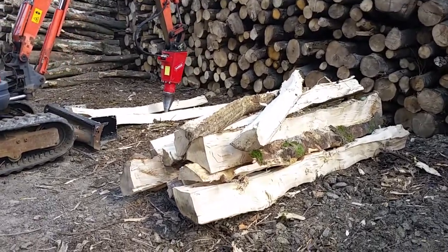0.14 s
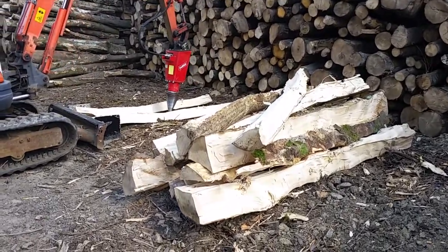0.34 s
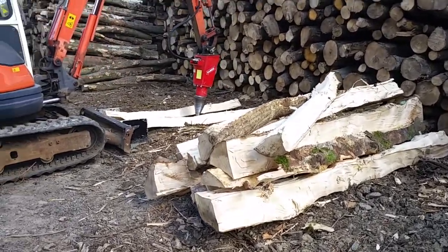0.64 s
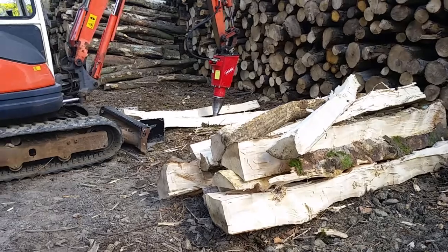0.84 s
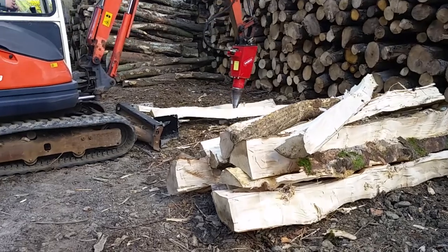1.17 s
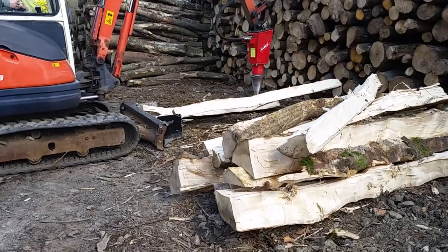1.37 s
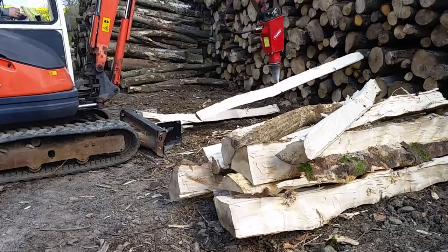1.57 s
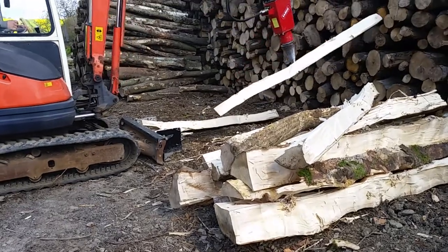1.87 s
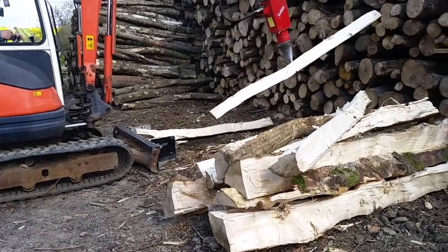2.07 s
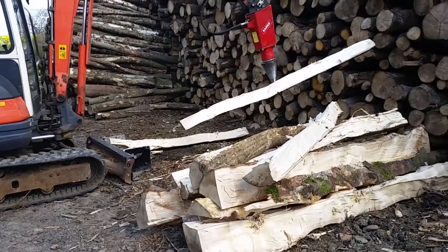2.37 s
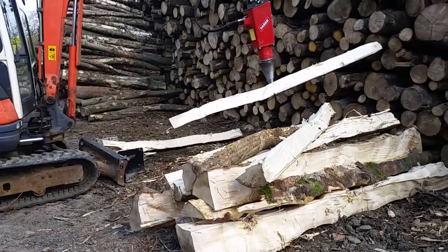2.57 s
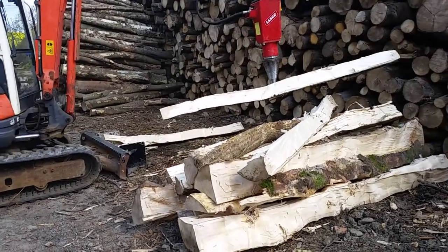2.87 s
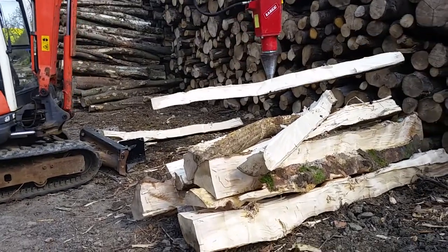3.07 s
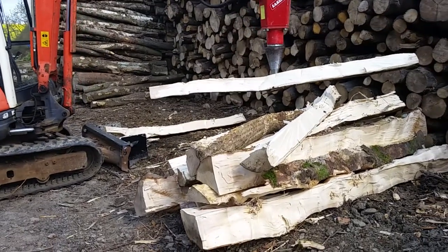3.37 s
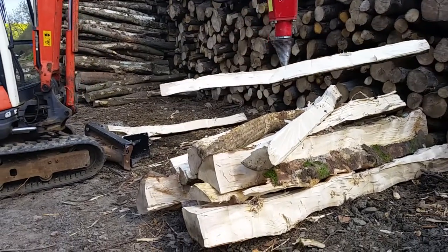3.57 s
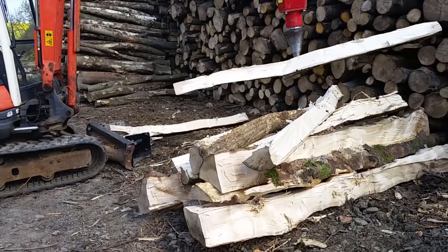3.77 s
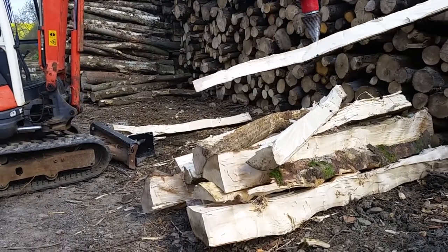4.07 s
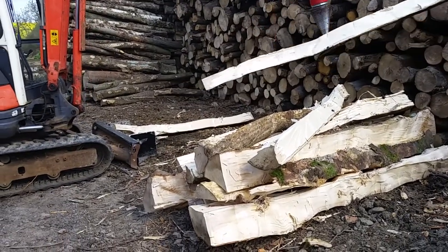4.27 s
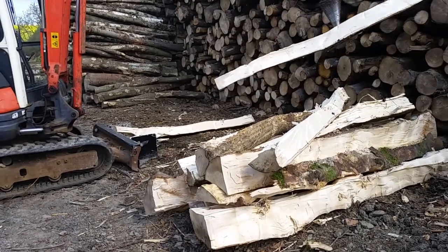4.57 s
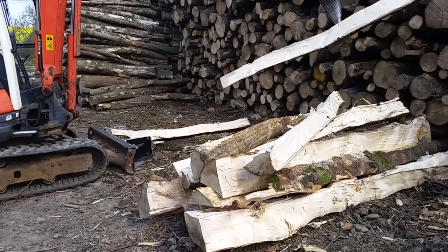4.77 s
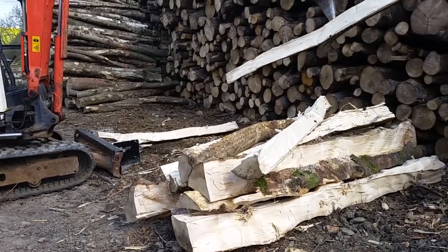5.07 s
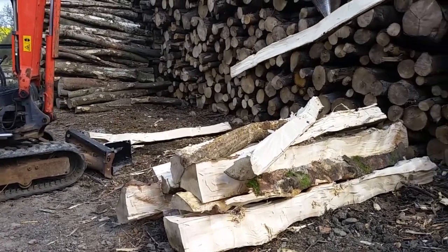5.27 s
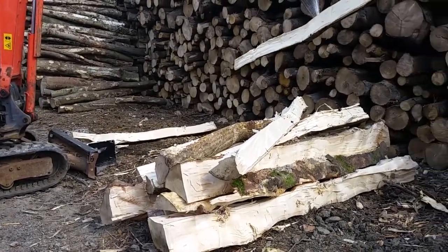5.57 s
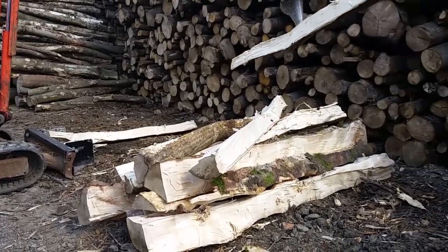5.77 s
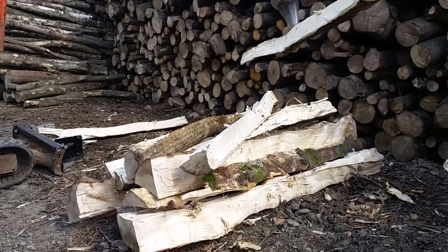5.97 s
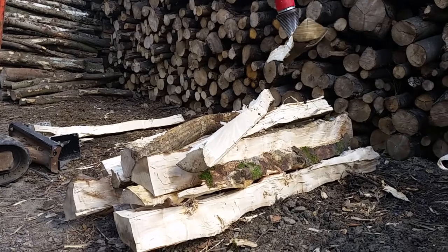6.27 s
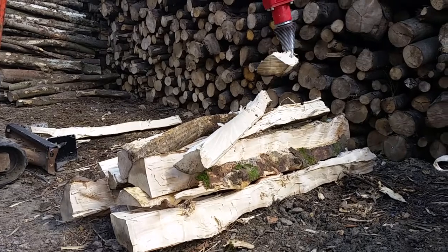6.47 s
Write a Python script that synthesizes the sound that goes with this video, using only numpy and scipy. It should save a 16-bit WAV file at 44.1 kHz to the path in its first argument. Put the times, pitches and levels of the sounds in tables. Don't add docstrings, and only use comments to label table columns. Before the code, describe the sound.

Low throbbing engine drone fills a wide phone pickup, slightly favouring machines to the left. Hydraulic flow hisses strongly at first, with a brief falling whistle and a whine. Wood cracks and hollow thuds cluster in the first second or so, mixed with gritty clicks and a metallic squeak. The hiss then eases; faint high chirps gather toward the end, a finger snaps against the left edge, and timber taps lightly.

```python
import sys
import numpy as np
from scipy import signal
from scipy.fft import rfft, irfft, next_fast_len
from scipy.io import wavfile
from scipy.ndimage import uniform_filter1d

SR = 44100
rng = np.random.default_rng(int(sys.argv[2]) if len(sys.argv) > 2 else 0)


def nominal_scale(level):
    x = np.asarray(level, float) / 20
    return 10 ** x


def waveform_to_disk(signal):
    frames = np.transpose(np.atleast_2d(signal))
    scaled = np.clip(frames, -1, 1) * 32767
    samples = np.round(scaled).astype(np.int16)
    wavfile.write(sys.argv[1], SR, samples)


N = 292824
LONG = next_fast_len(N)
FREQ = np.fft.rfftfreq(LONG, 1 / SR)

# (time [s], firings gained on four per idler cycle [count], boom level [dB])
EXCAVATOR_LOAD = [(0.0, -0.288, -19.6), (0.64, 0.931, -22.3), (1.08, 2.091, -24.1), (1.16, 2.263, -20.0),
                  (1.31, 1.99, -24.9), (1.66, 1.67, -25.9), (2.09, 1.498, -19.5), (2.28, 1.536, -21.2),
                  (2.99, 2.695, -21.8), (3.11, 2.846, -21.7), (3.66, 3.078, -24.8), (4.05, 3.122, -20.9),
                  (4.38, 3.496, -22.4), (4.72, 3.582, -21.1), (5.06, 3.811, -27.0), (5.39, 3.921, -23.8),
                  (5.96, 3.753, -27.4), (6.64, 3.501, -24.7)]
# (multiple of cycle rate [count], level [dB])
IDLER_LINES = [(5, -44), (6, -51.5), (7, -28), (8, -15.5), (9, -51), (10, -39), (11, -47.5), (12, -44.5),
               (14, -50.5), (15, -42), (16, -42), (20, -52.5)]
# (thirds of the firing rate [count], level [dB])
EXCAVATOR_LINES = [(4, -50.5), (5, -57.5), (7, -52), (8, -41), (10, -46.5), (12, -63.5), (15, -62.5),
                   (18, -48), (24, -48.5)]
# (frequency [Hz], level per Hz [dB], share reaching both ports alike [0-1])
ROAR_SPECTRUM = [(22, -70.5, 0.98), (41.3, -50.5, 0.7), (71.4, -44.5, 0.86), (128, -42.5, 0.89),
                 (174, -48.5, 0.95), (329, -62.5, .92), (493, -64.5, .88), (543, -73, 0.6),
                 (597, -71.5, .85), (916, -78.5, 0), (1250, -81.5, 0.9), (2320, -91.5, 0.2),
                 (3750, -81.5, .15), (15800, -106, .4)]
# (time [s], whine frequency [Hz], whine level [dB], oil flow above resting hiss [dB])
PUMP_WORK = [
    (0, 630.7, -54.5, 5.5),
    (.5, 644.2, -49, 6),
    (.7, 640, -62.5, 4),
    (1.7, 629.6, -53.5, 4.5),
    (2.0, 639.7, -65.5, 2.5),
    (2.8, 668, -68.5, 0.5),
    (3.2, 680, -52.5, 0),
    (5.4, 670.8, -53, 0),
    (5.9, 673, -57.5, -0.5),
    (6.64, 678, -49, 1.5),
]
# (frequency [Hz], level [dB])
MACHINE_HUMS = [(217, -42), (265, -47.5), (310, -50), (410, -54), (480, -57), (780, -69), (900, -59),
                (1126, -64.5)]
# (time [s], frequency [Hz], level [dB])
VALVE_WHISTLE = [
    (0, 6700, -90),
    (.2, 6650, -62),
    (.38, 6300, -60),
    (.46, 5850, -60),
    (.55, 5800, -64),
    (.62, 5800, -95),
]
# (time [s], peak level [dB], ring frequency [Hz], body over peak [dB], time to fall 60 dB [s])
TIMBER_KNOCKS = [(0.566, -27, 2600, 1, 0.13), (0.853, -20, 2300, -4.5, 0.29), (0.932, -32, 1740, 7.5, 0.31),
                 (0.948, -15.5, 1744, -1, 0.25), (0.975, -32.5, 1860, 1.5, 0.12),
                 (1.035, -25, 2550, 4, 0.42), (1.059, -37.5, 2550, 6, 0.39), (1.109, -28, 2000, 6, 0.43),
                 (1.152, -17, 1880, -7.5, 0.14), (1.447, -38.5, 1610, 1, 0.28),
                 (1.479, -40, 1664, 11, 0.11), (1.586, -36, 2300, 12, 0.2), (1.684, -36.5, 1600, 11, 0.18),
                 (1.949, -34, 1880, 9, 0.236), (2.209, -42.5, 1836, 5.5, 0.13),
                 (3.968, -36.5, 1400, 8.5, 0.38), (6.018, -39, 1720, 0, 0.15),
                 (6.458, -34, 2560, 8.5, 0.18)]
# (time [s], frequency [Hz], level [dB], time to fall 60 dB [s])
WOOD_TAPS = [(0.5655, 1920, -21.5, .008), (0.567, 3860, -33, .008), (0.471, 3800, -30, 0.013),
             (0.568, 6400, -21, .008), (0.938, 777, -26, 0.11), (0.946, 329, -19, 0.18),
             (0.984, 263, -15, 0.23), (1.105, 289, -19, .08), (1.036, 635, -31.5, 0.39),
             (1.154, 2000, -35, 0.013), (1.154, 284, -14, .07), (1.155, 1120, -29, 0.065),
             (1.585, 1400, -37.5, .03), (1.949, 1860, -42.5, .08), (1.949, 700, -30, .05),
             (6.017, 1700, -50, 0.028), (6.018, 666, -25.5, 0.042), (6.024, 886, -41.5, 0.16),
             (6.458, 2550, -37, .02), (6.458, 1700, -38.5, .02), (6.464, 713, -28.5, 0.098),
             (6.468, 2120, -44.5, 0.13)]
# (time [s], peak level [dB], left minus right [dB])
GRIT_TICKS = [(0.0703, -30, -13), (0.0936, -30, -0.5), (0.110, -43, -1), (0.1487, -34, -6.5),
              (0.179, -19.5, -7.5), (0.3731, -20.5, 3), (0.4705, -27.5, -8.5), (0.5354, -37, 7),
              (0.5679, -23, -3.5), (0.852, -38, 0.5), (0.932, -33, -2), (0.9483, -29.5, 10),
              (0.9798, -24.5, -13), (1.1224, -37, -22), (1.151, -42, -10), (1.275, -37.5, -10),
              (1.397, -32, 4), (1.72, -32.5, -1)]
# (time [s], frequency [Hz], level [dB], length [s], left minus right [dB])
CONE_SQUEAKS = [
    (1.075, 8760, -20, .007, -4),
    (1.1, 8700, -36, .012, -4),
    (1.106, 5300, -40, .003, -4),
    (1.116, 5420, -22, .008, -4),
    (1.116, 3610, -38, .008, -3),
    (1.115, 7250, -38, .006, -3),
    (1.169, 4290, -35, .006, 0),
]
# (time [s], level about usual [dB])
BELT_SLIP = [(0, -4), (1.0, -10), (1.3, 12.5), (1.6, -0.5), (2.7, -13.5), (3.5, 1), (5.45, 1), (5.58, 16.5),
             (6.0, 3), (6.3, 15), (6.64, 2)]
# (time [s], peak level [dB], left minus right [dB])
BELT_CHIRPS = [(2.522, -47, 8), (2.7528, -47, 11.5), (2.814, -43.5, 2.5), (2.9639, -41.5, 6.5),
               (3.485, -38, 6.5), (3.562, -41, 5.5), (3.88, -42, -3), (4.1781, -40.5, 5.5),
               (4.2724, -45.5, -2.5), (4.331, -41.5, 4), (4.368, -46.5, -0.5), (4.407, -43, 1),
               (4.652, -45.5, 9.5), (4.8195, -37.5, 12), (5.3689, -43.5, 7), (5.56, -44, 15),
               (5.665, -40.5, 15.5), (5.743, -46.5, 9), (5.766, -38.5, 23), (5.832, -38.5, 16.5),
               (6.082, -30, 8.5), (6.1232, -53, 2.5), (6.146, -38.5, 10.5), (6.261, -47, -3),
               (6.314, -37, 17.5), (6.34, -34.5, 17), (6.392, -39, 5), (6.503, -42.5, 12.5),
               (6.527, -40.5, 17.5), (6.556, -40, 23)]
# (time [s], level [dB])
FINGER_CLICKS = [(5.4628, -33), (5.4825, -49), (5.509, -32), (5.5115, -34), (5.522, -45), (5.526, -42),
                 (5.533, -35), (5.536, -30.5), (5.541, -31), (5.545, -28.5), (5.5475, -31.5), (5.5524, -12),
                 (5.563, -45)]
# (frequency [Hz], left level [dB], right level [dB])
PORT_COLOUR = [(96, -1.02, 0.38), (1460, 2, 3), (2580, 0, 3), (3650, 4.5, -9), (3960, -1, -10),
               (4760, -12.5, -12), (6650, -28.5, -21), (8600, -40.5, -27.5), (10940, -11, -17.5),
               (11600, -5.5, -4.5), (15400, 18.5, 16.5), (15800, 12.5, 6.5), (15960, -39, -31)]


def curves(table):
    s, *columns = np.transpose(table)
    return [np.interp(np.arange(N) / SR, s, c) for c in columns]


def along(table, axis):
    rows = np.array(table)
    return np.interp(np.log(FREQ + 1), np.log(rows[:, 0]), rows[:, axis])


def walk(rate):
    hold = int(SR / rate)
    steps = np.repeat(rng.standard_normal(N // hold + 1), hold)
    return 0.87 * uniform_filter1d(steps, hold)[:N]


def band(x, hz, width_hz):
    return signal.lfilter(*signal.iirpeak(hz, hz / width_hz, SR), x)


def steep(x, hz, width_hz):
    ringing = band(band(x, hz, width_hz), hz, width_hz)
    return ringing / np.sqrt(np.mean(ringing ** 2))


def add(out, s, sound, pan_db):
    i = int(s * SR)
    sides = nominal_scale(np.array([[pan_db], [-pan_db]]) / 2)
    out[:, i:i + sound.shape[-1]] += (sides * sound)[:, :N - i]


def cranks():
    gained, boom_db = curves(EXCAVATOR_LOAD)
    idle_hz = 12.6412 - .00068 * (np.arange(N) / SR - 4.32) ** 2
    idler = 2 * np.pi * (-.259 + np.cumsum(idle_hz) / SR)
    digger = 4 * idler + 2 * np.pi * uniform_filter1d(gained, size=3000)
    return idler, digger, boom_db


def exhausts(idler, digger, boom_db):
    boom_lag = 1.43
    out = sum(nominal_scale(db + .4 * walk(3)) * np.cos(k * idler + boom_lag) for k, db in IDLER_LINES)
    out += nominal_scale(boom_db + 1.5) * np.cos(2 * digger + boom_lag)
    out += nominal_scale(-33) * np.cos(4 * idler - .65)
    out += nominal_scale(-28 + .4 * (boom_db + 22.5)) * np.cos(digger - .95)
    out += nominal_scale(-31 + 4.5 * walk(7.6)) * np.cos(3 * digger + .2)
    out += sum(nominal_scale(db + 0.61 * walk(2.7)) * np.cos(k / 3 * digger + k) for k, db in EXCAVATOR_LINES)
    return np.sqrt(2) * out


def drag():
    peak_s, rise_s, fall_s = 0.95, 0.098, 0.44
    return np.interp(np.arange(N) / SR, [peak_s - rise_s, peak_s, peak_s + fall_s], [0, 1, 0])


def roar(idler, digger):
    drag_db = 9 * drag()
    hiss_db = curves(PUMP_WORK)[2] + 0.23 * drag_db
    alike = np.clip(along(ROAR_SPECTRUM, axis=2), 0, 1)
    common, left, right = rfft(rng.standard_normal((3, LONG)))
    both = np.sqrt(alike) * common + np.sqrt(1 - alike) * np.array([left, right])
    both = both * nominal_scale(along(ROAR_SPECTRUM, axis=1)) * np.sqrt(SR / 2)
    firing = np.cos(digger)
    rattle = 1.3 * (np.cos(idler) + np.cos(digger) + walk(180))
    out = 0
    for step in range(20):
        share = np.clip(1 - abs(2 * np.log2((FREQ + 1) / 22) - step), 0, 1)
        high = np.clip((step - 11) / 7, 0, 1)
        db = (1 - high) * (drag_db * (step > 5) + .7 * firing)
        db = db + high ** 2 * hiss_db + high ** 3 * rattle + 1.3 * walk(11)
        out = out + nominal_scale(db) * irfft(both * share, LONG)[:, :N]
    return out


def timber():
    out, t = np.zeros((2, N)), np.arange(SR // 4) / SR
    for s, db, ring_hz, body_db, t60 in TIMBER_KNOCKS:
        thud_db = -5 + 3 * max(db + 18, 0)
        noise = rng.standard_normal((6, len(t)))
        fibres = nominal_scale(3.5 * uniform_filter1d(noise[0], size=30) * np.sqrt(30))
        splinters = fibres * (noise[1] + .7 * noise[2:4])
        crack = steep(splinters, 1400, 3600) + nominal_scale(-6) * steep(splinters, ring_hz, 600)
        crack += nominal_scale(-1 + 20 * t / t60) * steep(splinters, 5800, 2000)
        body = nominal_scale(body_db) * steep(noise[4], 680, 260)
        body += nominal_scale(thud_db + 8) * steep(noise[5], 270, 260)
        attack = np.minimum(t / 0.0021, 1)
        fade = attack * (nominal_scale(-60 * t / t60) + nominal_scale(-6 - 60 * t / .012))
        add(out, s, nominal_scale(db - 14.5) * fade * (crack + body), -1)
    return out


def taps():
    out, t = np.zeros((2, N)), np.arange(SR // 5) / SR
    for s, hz, db, t60 in WOOD_TAPS:
        attack = np.minimum(t * hz / 2, 1)
        add(out, s, nominal_scale(db - 60 * t / t60) * attack * np.sin(2 * np.pi * hz * t), 0)
    return out


def steel():
    out, t = np.zeros((2, N)), np.arange(SR // 8) / SR
    tick_t60 = 0.013
    fade = nominal_scale(-60 * t / (0.55 * tick_t60)) + nominal_scale(-17.5 - 60 * t / (4 * tick_t60))
    for s, db, pan_db in GRIT_TICKS:
        spark = rng.standard_normal(len(t))
        grit = band(spark, 11000, 12000) + nominal_scale(-1) * band(spark, 6000, 3500)
        add(out, s, nominal_scale(db - 8.5) * grit * fade, pan_db)
    for s, hz, db, length, pan_db in CONE_SQUEAKS:
        grip = t / length * np.exp(1 - t / length)
        roughness = .3 * steep(rng.standard_normal(len(t)), hz, 450)
        note = np.sin(2 * np.pi * hz * t) + roughness
        add(out, s, nominal_scale(db) * grip ** 2 * note, pan_db)
    return out


def belt(idler):
    low = steep(rng.standard_normal(N), 13930, 150)
    top = steep(rng.standard_normal(N), 15390, 500)
    slip = nominal_scale(curves(BELT_SLIP)[0] + 3.5 * np.cos(idler) + 3.1 * walk(25))
    out = slip * (nominal_scale(-76) * low * nominal_scale(np.array([[1.5], [-1.5]])) + nominal_scale(-74.5) * top)
    chirp_s = .026
    t = np.arange(int(chirp_s * SR)) / (chirp_s * SR)
    shape = np.minimum(t / .08, 1) * (1 - t) ** .7
    for s, db, pan_db in BELT_CHIRPS:
        top_db = -3 - 5 * max(s - 3, 0)
        i = int(s * SR)
        notes = (nominal_scale(-8.5) * low + nominal_scale(top_db + 1.0) * top)[i:i + len(t)]
        add(out, s, nominal_scale(db - 15.0) * shape[:len(notes)] * notes, pan_db)
    return out


def finger():
    out, t = np.zeros((2, N)), np.arange(400) / SR
    click = np.sin(2 * np.pi * 3300 * t) * nominal_scale(-60 * t / 0.0021)
    click -= np.sin(2 * np.pi * 1500 * t) * nominal_scale(-60 * t / 0.0012)
    click = 1.2 * band(click * np.minimum(t / .0003, 1), 2400, 5000)
    for s, db in FINGER_CLICKS:
        add(out, s, nominal_scale(db) * click, 23)
    creep = band(rng.standard_normal(2000), 3000, 2500) * np.linspace(.3, 1, 2000)
    add(out, 5.508, nominal_scale(-44.5) * creep, 23)
    return out


def pump(idler):
    whine_hz, whine_db, flow_db = curves(PUMP_WORK)
    depth_db = np.where(np.arange(N) < 5.8 * SR, 3.5, 8)
    throb_db = depth_db * np.cos(idler + 1.1) + 1.5 * walk(30)
    whine_angle = 2 * np.pi * np.cumsum(whine_hz + 5 * walk(40)) / SR
    out = nominal_scale(whine_db + 2.5 + throb_db) * np.cos(whine_angle)
    for hz, db in MACHINE_HUMS:
        hum_angle = 2 * np.pi * np.cumsum(hz * (1 + .006 * walk(6))) / SR
        out += nominal_scale(db + 0.6 * walk(4.4)) * np.cos(hum_angle)
    whistle_hz, whistle_db = curves(VALVE_WHISTLE)
    whistle_angle = 2 * np.pi * np.cumsum(whistle_hz + 60 * walk(90)) / SR
    out += nominal_scale(whistle_db + 8.5 + 7 * walk(40)) * np.cos(whistle_angle)
    valve_db = -75 + 5.1 * flow_db + 3.5
    return out + nominal_scale(valve_db) * steep(rng.standard_normal(N), 1700, 460)


def scene():
    idler, digger, boom_db = cranks()
    machines = exhausts(idler, digger, boom_db) + roar(idler, digger) + pump(idler) + belt(idler)
    lag = round(.0003 * SR)
    machines[1] = np.interp(np.arange(N) - lag, np.arange(N), machines[1])
    return machines + timber() + taps() + steel() + finger()


def top_cut(x):
    return signal.sosfilt(signal.butter(12, 16960, fs=SR, output="sos"), x)


def record(dry):
    colour = nominal_scale(np.array([along(PORT_COLOUR, axis=1), along(PORT_COLOUR, axis=2)]))
    heard = irfft(rfft(dry, LONG) * colour, LONG)[:, :N]
    mix = np.tanh(0.57 * heard) / 0.61
    return top_cut(mix)


dry = scene()
out = record(dry)
waveform_to_disk(out)
```